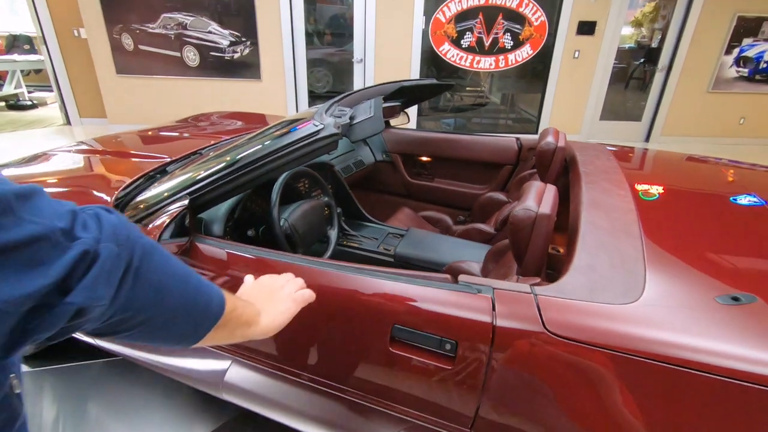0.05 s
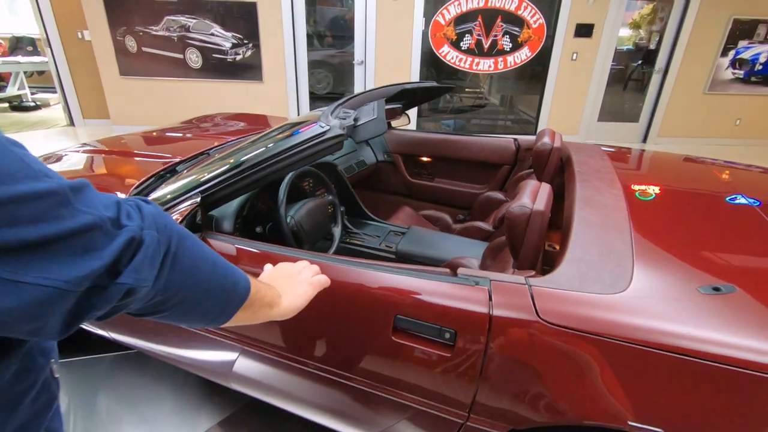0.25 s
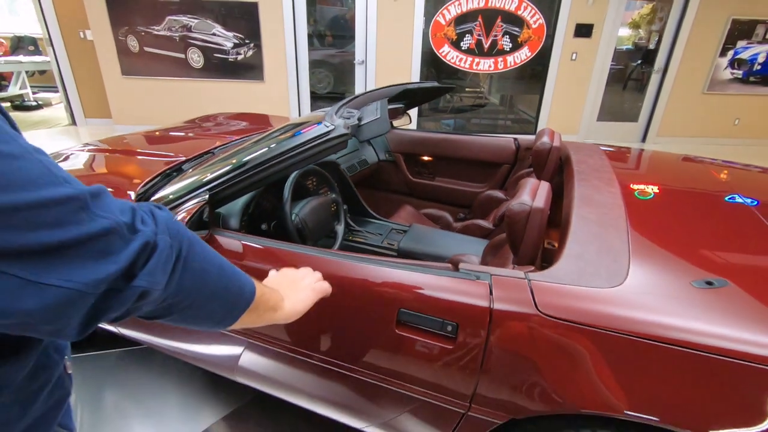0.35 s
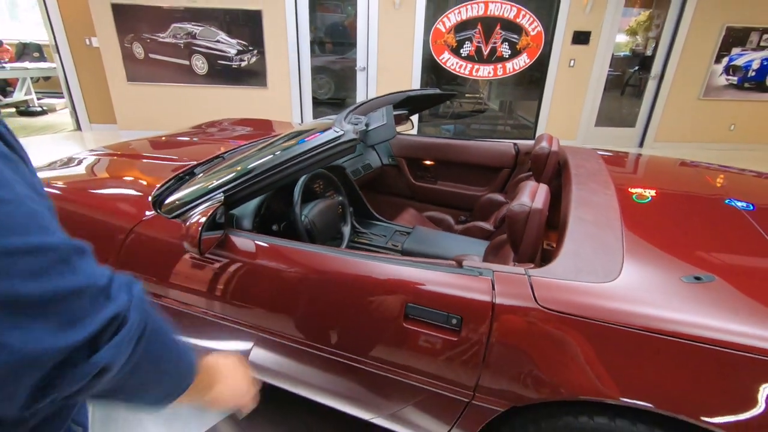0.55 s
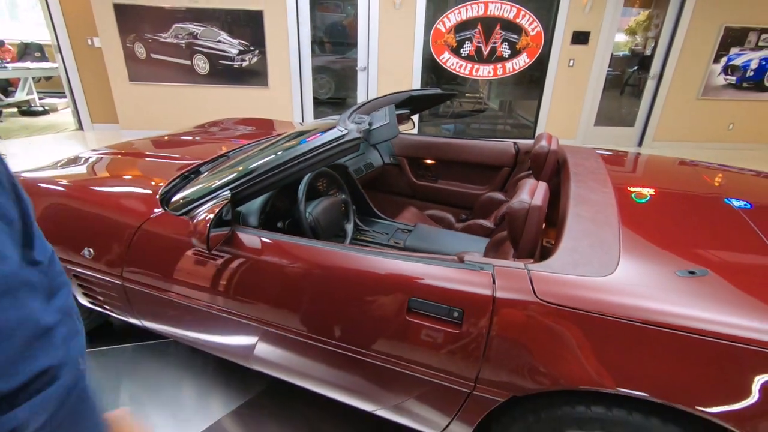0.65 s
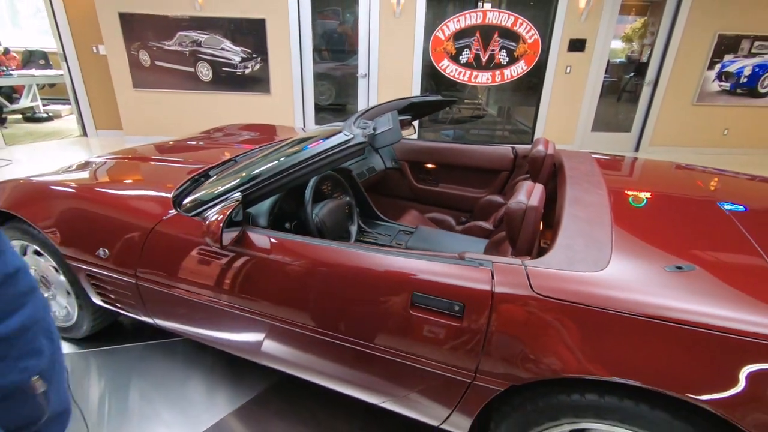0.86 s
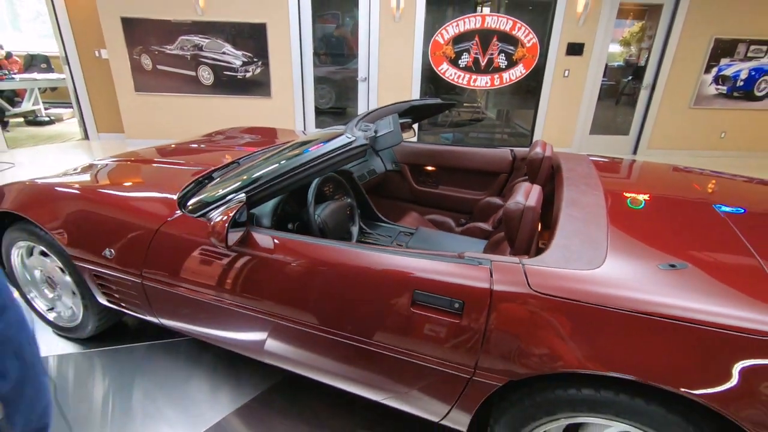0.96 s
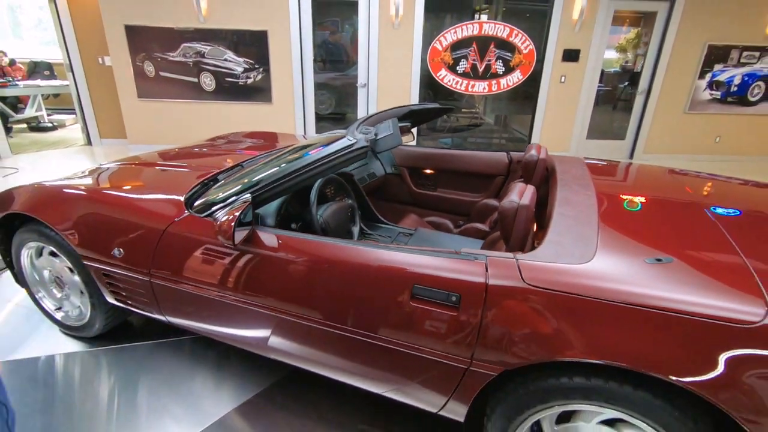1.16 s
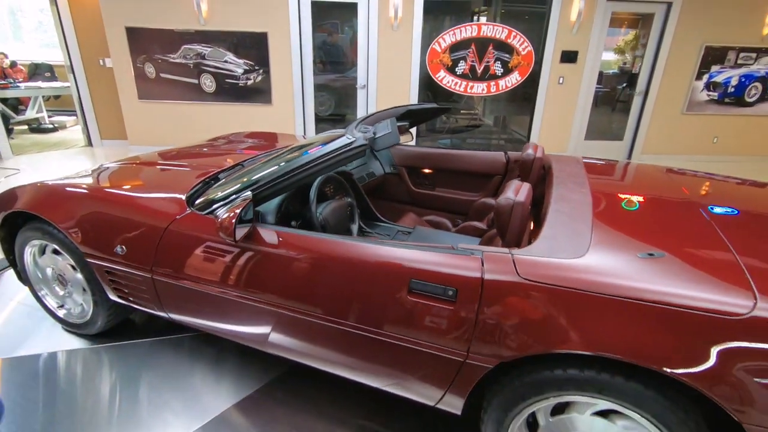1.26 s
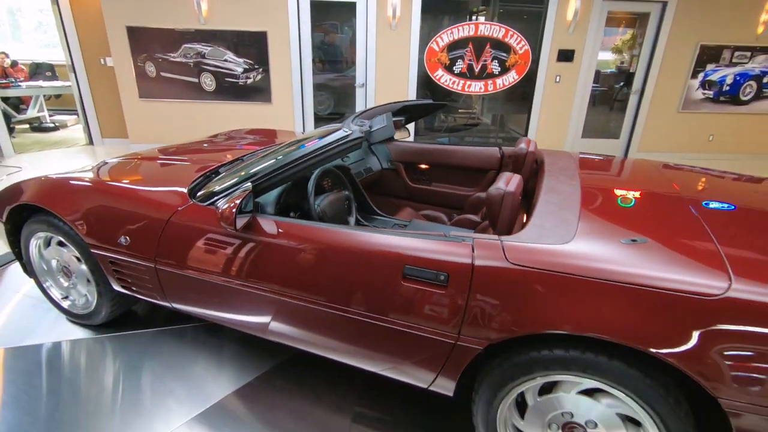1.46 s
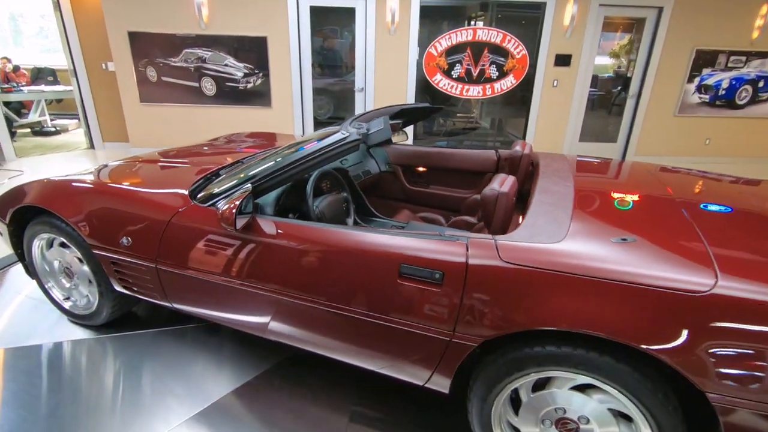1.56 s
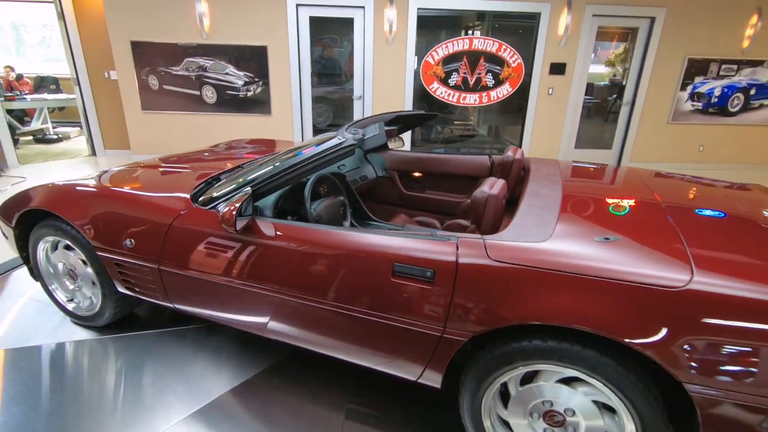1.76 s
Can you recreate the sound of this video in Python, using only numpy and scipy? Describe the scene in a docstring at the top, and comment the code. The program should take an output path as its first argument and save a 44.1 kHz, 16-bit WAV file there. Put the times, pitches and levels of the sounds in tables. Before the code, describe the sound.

A car door is swung shut in a large showroom, its latch snapping with a solid, briefly echoing thump. Faint ticks, clothes rustle and a few soft bumps on the hand-held microphone follow over a low ventilation hum.

```python
"""A car door is swung shut in a large showroom: the latch brushes the striker and snaps over it, then the
door lands on its seals with a thump that rings the body, and the hall answers the contacts.
Afterwards come faint ticks and shuffles and a few soft bumps on a hand-held camera.
Clothes rustle quietly throughout, over a bed of ventilation and low machine hum."""
import sys
import numpy as np
from scipy import signal
from scipy.fft import rfft, irfft, next_fast_len
from scipy.io import wavfile
from scipy.ndimage import uniform_filter1d

SR = 44100
rng = np.random.default_rng(int(sys.argv[2]) if len(sys.argv) > 2 else 0)


def transcribe(signal):
    """Save signal, clipped to [-1, 1], as a 16-bit WAV file at the path in sys.argv[1]."""
    frames = np.atleast_2d(signal).T
    limited = np.clip(frames, -1, 1)
    pcm = np.round(limited * 32767).astype(np.int16)
    wavfile.write(sys.argv[1], SR, pcm)


N = 79380
T = np.arange(N) / SR


def door():
    """Dull blows on the rubber seals, the low push of the door skin and the ringing car body."""
    # The door lands and stops. Each row: start in seconds, level in dB, t60 in seconds.
    landings = [(0.2034, -30.5, .05), (.2345, -24.5, .07), (.2415, -17.5, 0.16), (.2495, -19.5, .1)]
    # The dark tone of a blow. Each row: frequency in Hz, relative noise density in dB.
    colour = [(40, -1.5), (100, -6.5), (200, 1.5), (330, 3), (480, 3.5), (750, -7.5), (1400, -8),
              (2100, -16), (3000, -17.5), (6000, -30.5), (15000, -40)]
    # The panel's short clunk. Each row: mode in Hz, level in dB against the blow, t60 in seconds.
    panel = [(419.7, -1.5, 0.036), (528, -6, 0.04), (613.4, -4.5, 0.058), (699, -7.5, 0.062)]
    # The weight of the thump. Each row: start in seconds, pitch in Hz, level in dB, length in seconds.
    pushes = [(.207, 72, -21, .03), (.2315, 120, -11.5, .027)]
    # The ring of door and body. Each row: mode in Hz, level in dB, t60 in seconds.
    body_modes = [(72, -30, .7), (88, -32, .5), (110, -21, .6), (134, -30, .65), (174, -30, .6),
                  (274, -30, .45), (315, -31, .42), (353, -34, .35), (419, -31, .33), (451, -30, .33),
                  (516, -34, .28), (581, -38, .3), (665, -37, .22)]
    blows = sum(amp(db) * contact(start, t60, colour, panel, rise=0.00086, wet_db=-10.5)
                for start, db, t60 in landings)
    skin = np.zeros(N)
    for start, hz, db, length in pushes:
        swell = np.sin(np.pi * np.clip((T - start) / length, 0, 1)) ** 2
        skin += amp(db) * np.sin(2 * np.pi * hz * (T - start)) * swell
    body = sum(amp(db) * ring(0.238 + rng.uniform(0, 0.01), hz, t60, rise=0.01)
               for hz, db, t60 in body_modes)
    return blows + skin + body


def latch():
    """The steel claw brushes the striker, snaps over it and settles in a quick run of bright cracks."""
    # Claw meets striker. Each row: start in seconds, level in dB, t60 in seconds.
    cracks = [(0.1861, -36.5, 0.09), (0.1976, -32.5, 0.09), (0.2037, -13, 0.034), (0.208, -17.5, 0.026),
              (.2140, -14.5, 0.034), (0.2319, -30.5, 0.052), (0.2387, -20.5, 0.02), (0.2495, -35, 0.025),
              (0.2719, -35.5, .02)]
    # The tone of a crack. Each row: frequency in Hz, relative noise density in dB.
    colour = [(60, -13.5), (200, -4.5), (450, 13), (750, 0.5), (1200, 0.5), (2000, -3), (3000, -2),
              (4600, -3.5), (6500, -10), (8300, -11.5), (11500, -24), (16000, -27.5)]
    # The steel's ring. Each row: mode in Hz, level in dB against the crack, t60 in seconds.
    steel = [(717, -13.5, 0.1), (1057, -10, 0.027), (2346, -28.5, 0.087), (2920, -12, .05),
             (3976, -14, 0.031), (4640, -15.5, .05), (5975, -20.5, .04), (8170, -18.5, 0.032)]
    return sum(amp(db) * contact(start, t60, colour, steel, rise=0.00055, wet_db=-12.5)
               for start, db, t60 in cracks)


def contact(start, t60, colour, modes, rise, wet_db):
    """One hit: a noise burst that fills the hall, and dry modes that differ a little each time."""
    burst = fade(start, t60, rise) * coloured_noise(colour)
    return hall(burst, wet_db) + sum(
        amp(db + rng.normal(0, 2.7)) * ring(start + rng.random() / hz, hz, mode_t60, rise)
        for hz, db, mode_t60 in modes)


def hall(dry, wet_db):
    """Adds ten reflections off near walls and, at wet_db, a tail whose treble the air absorbs first."""
    predelay_s, build_s, last_wall_s, walls_db = 0.012, 0.004, 0.049, -11.5
    bass_t60_s, half_t60_hz = 0.8, 7500
    hz, t, spectrum = signal.stft(rng.standard_normal(N), SR, nperseg=256)
    t60 = bass_t60_s / (1 + (hz / half_t60_hz) ** 2.8)
    decay = np.exp(-np.log(1000) * t / t60[:, None])
    tail = signal.istft(spectrum * decay, SR, nperseg=256)[1][:N]
    tail *= 1 - np.exp(-np.maximum(T - predelay_s, 0) / build_s)
    walls = np.zeros(N)
    delays = rng.uniform(predelay_s, last_wall_s, size=10)
    walls[(delays * SR).astype(int)] = rng.standard_normal(len(delays))
    response = amp(wet_db) * tail / np.linalg.norm(tail) + amp(walls_db) * walls / np.linalg.norm(walls)
    return dry + signal.fftconvolve(dry, response)[:N]


def ticks():
    """A last rattle of the door, then light ticks and shuffles as the person steps back."""
    # Each row: start in seconds, level in dB, centre in Hz, width in octaves, t60 in seconds.
    touches = [(0.3295, -37.5, 3564, 0.93, .026), (.8265, -53, 5570, .1, 0.011),
               (0.8552, -36.5, 500, 1.29, 0.028), (0.876, -51, 1490, 1.2, 0.015),
               (1.16, -60, 1403, 1.33, 0.063), (1.273, -51, 650, 1.4, 0.019),
               (1.426, -55.5, 2420, 1.05, 0.041), (1.631, -63, 2400, 1.1, 0.042)]
    bursts = sum(amp(db) * fade(start, t60, rise=0.0015) * band_noise(centre, width)
                 for start, db, centre, width, t60 in touches)
    return hall(bursts, wet_db=-11.5)


def handling_bumps():
    """Bumps reach the microphone through the camera: a faint click, a dry low pulse, a slower swing."""
    # Each row: start in seconds, pulse level in dB, pulse pitch in Hz, click level in dB.
    bumps = [(0.8194, -23.5, 156.4, -54), (1.0294, -21.5, 166.7, -47), (1.5693, -19, 134, -54.5),
             (1.7005, -16.5, 125, -49)]
    # The tone of a click. Each row: frequency in Hz, relative noise density in dB.
    colour = [(200, 3.5), (1800, -7.5), (3000, -13), (6000, -20), (15000, -26)]
    sound = np.zeros(N)
    for start, db, hz, click_db in bumps:
        pulse = ring(start, hz, t60=0.0091, rise=0.00005)
        swing_back = amp(0.5) * ring(start, hz=42.5, t60=0.029, rise=0.0051)
        click = fade(start, t60=0.025, rise=0.0001) * coloured_noise(colour)
        sound += amp(db) * (pulse - swing_back) + amp(click_db) * click
    return sound


def clothes_rustle():
    """Faint, uneven friction of sleeves and trousers as the person moves."""
    # The rustle's rise and fall. Each row: time in seconds, level in dB.
    contour = [(0, -69.5), (.13, -80), (.16, -69.5), (.25, -63.5), (.8, -67.5), (.92, -64.5), (1.1, -66),
               (1.3, -68.5), (1.5, -71), (1.8, -68)]
    # The soft tone of cloth. Each row: frequency in Hz, relative noise density in dB.
    colour = [(100, -21), (450, 4.5), (1400, -6), (3500, -16), (7000, -24), (15000, -24)]
    flutter_db = 0.5 * unit(uniform_filter1d(rng.standard_normal(N), size=400))
    level_db = np.interp(T, *np.transpose(contour)) + flutter_db
    return amp(level_db) * coloured_noise(colour)


def room_tone():
    """A low rush of ventilation and a steady machine hum."""
    # The tone of the moving air. Each row: frequency in Hz, relative noise density in dB.
    colour = [(25, -18.5), (45, -6.5), (80, -4), (130, 4.5), (250, 0), (350, -7), (500, -13.5), (800, -23),
              (1300, -24.5), (2500, -32.5), (5000, -34.5), (9000, -37), (15500, -37)]
    # The hum's partials. Each row: frequency in Hz, rms level in dB.
    partials = [(59.3, -49.5), (119, -66.5), (237, -72), (355, -71.5), (765, -78.5)]
    air = amp(-59) * coloured_noise(colour)
    hum = sum(amp(db) * unit(np.sin(2 * np.pi * (hz * T + rng.random()))) for hz, db in partials)
    return air + hum


def ring(start, hz, t60, rise):
    """One struck, damped mode."""
    return np.sin(2 * np.pi * hz * (T - start)) * fade(start, t60, rise)


def fade(start, t60, rise):
    """An envelope that rises from start and dies by 60 dB per t60; all times in seconds."""
    age = np.maximum(T - start, 0)
    return np.exp(-np.log(1000) * age / t60) * (1 - np.exp(-age / rise))


def coloured_noise(colour):
    """Noise whose spectrum follows (Hz, dB) points on a log frequency axis."""
    points_hz, points_db = np.transpose(colour)
    return noise(lambda hz: np.interp(np.log(hz + 1), np.log(points_hz + 1), points_db))


def band_noise(centre, width):
    """Noise in a bell around a centre in Hz, width in octaves."""
    return noise(lambda hz: -10 * np.log10(np.e) * (np.log2((hz + 1) / centre) / width) ** 2)


def noise(db_at):
    """Noise of rms 1, shaped by a dB function of frequency."""
    gain = amp(db_at(np.fft.rfftfreq(N, 1 / SR)))
    return unit(irfft(rfft(rng.standard_normal(N)) * gain, N))


def amp(db):
    """Decibels to gain."""
    return 10 ** (np.asarray(db) / 20)


def unit(x):
    """Scale to rms 1."""
    return x / np.sqrt(np.mean(x ** 2) + 1e-20)


def scene():
    """The door shutting, the small movements and the room bed, in mono."""
    return (latch() + door() + ticks() + handling_bumps() + clothes_rustle() + room_tone())[None]


def record(dry):
    """The camera keeps nothing above its band limit."""
    top_hz = 15950
    size = next_fast_len(N + SR // 2)
    passband = np.fft.rfftfreq(size, 1 / SR) < top_hz
    return irfft(rfft(dry, size) * passband, size)[..., :N]


dry = scene()
out = record(dry)
transcribe(out)
```